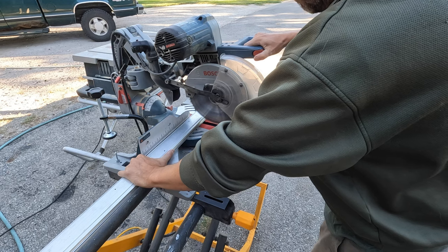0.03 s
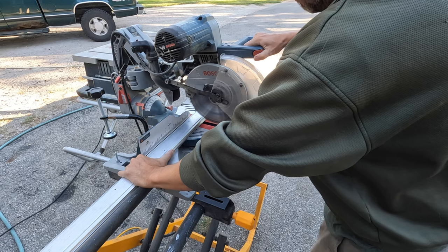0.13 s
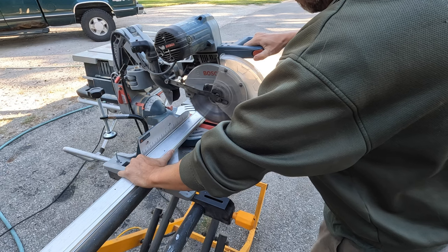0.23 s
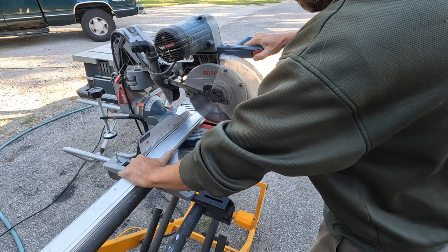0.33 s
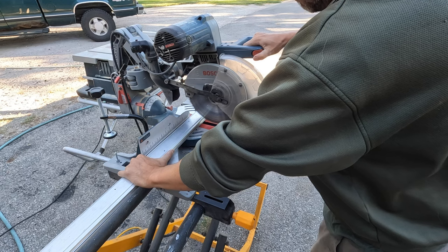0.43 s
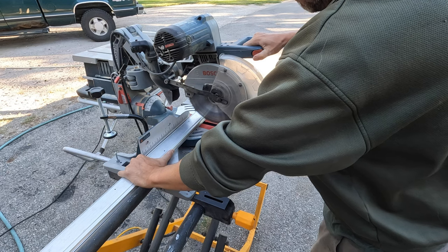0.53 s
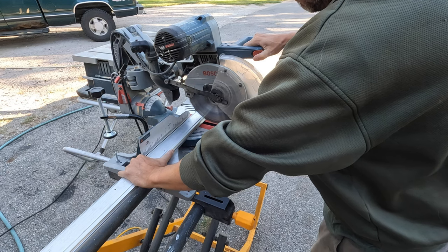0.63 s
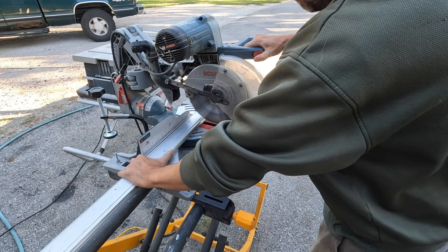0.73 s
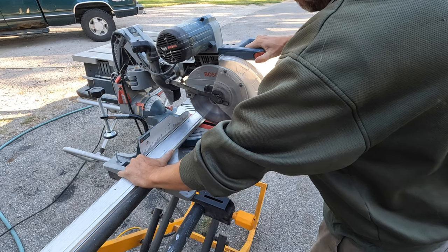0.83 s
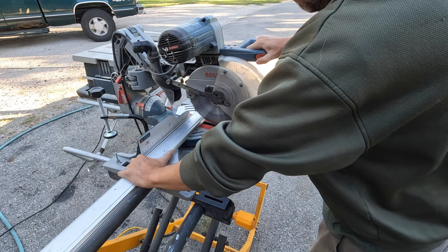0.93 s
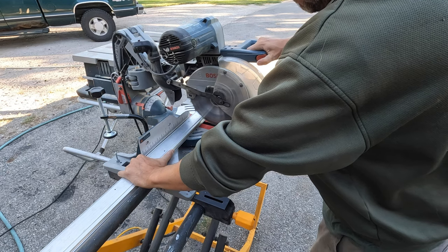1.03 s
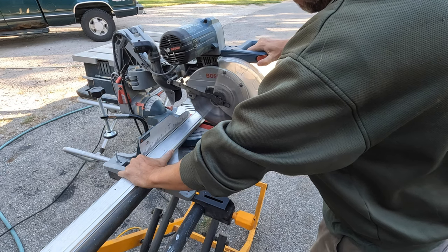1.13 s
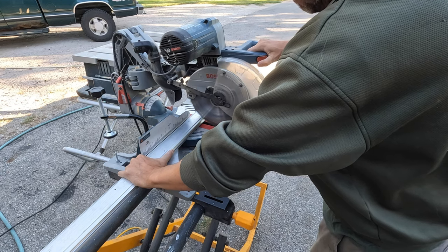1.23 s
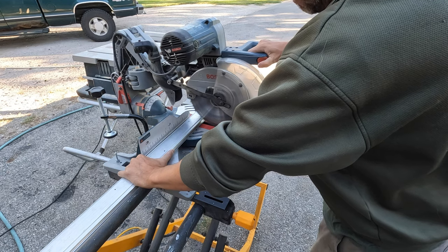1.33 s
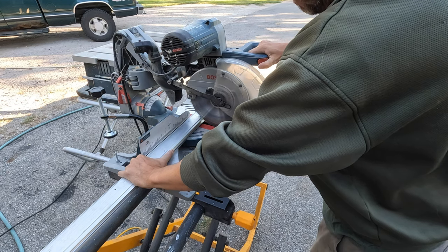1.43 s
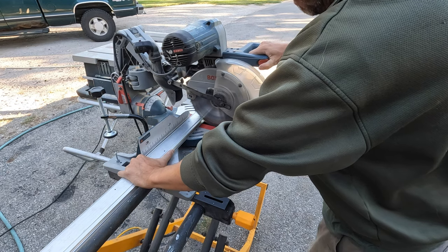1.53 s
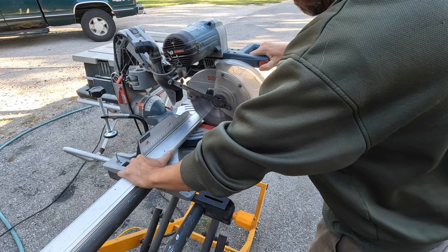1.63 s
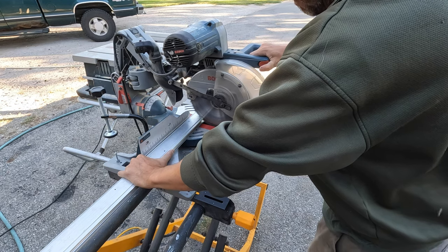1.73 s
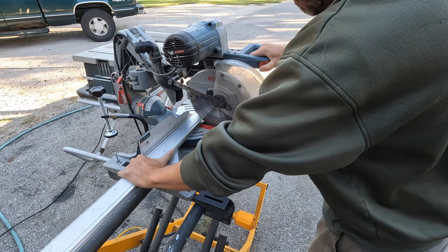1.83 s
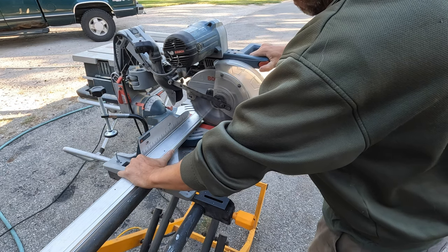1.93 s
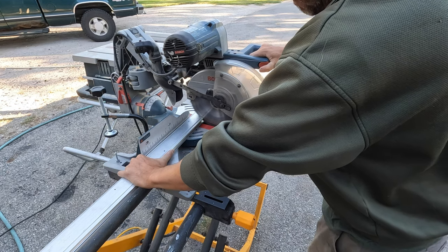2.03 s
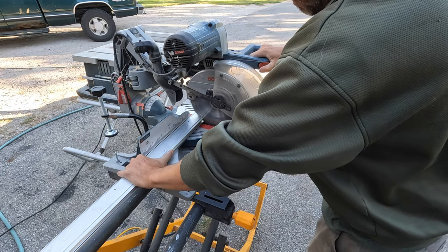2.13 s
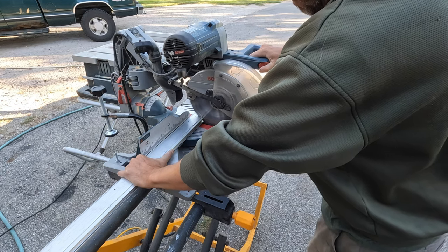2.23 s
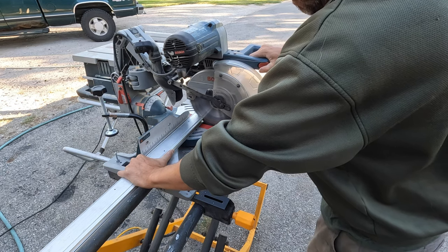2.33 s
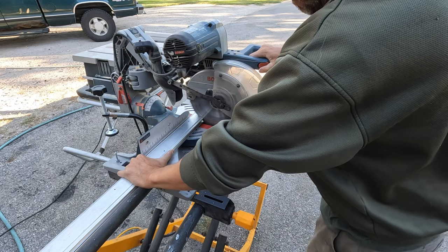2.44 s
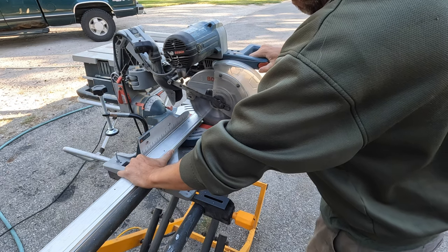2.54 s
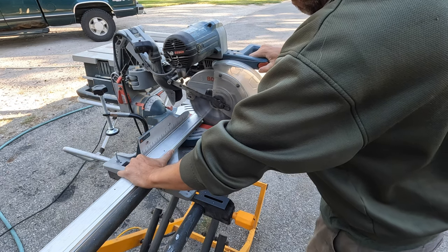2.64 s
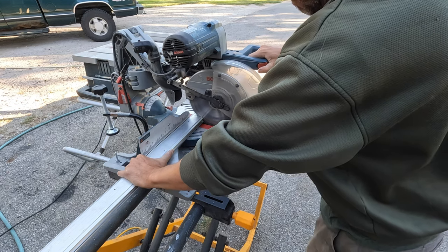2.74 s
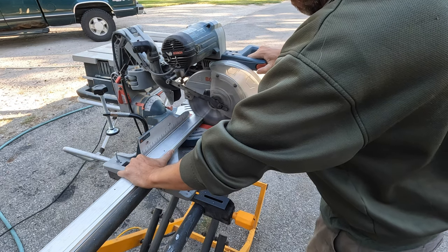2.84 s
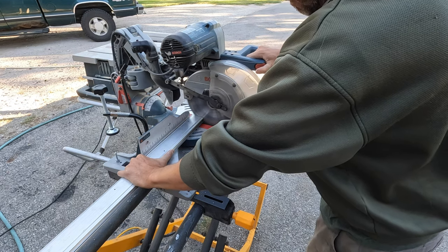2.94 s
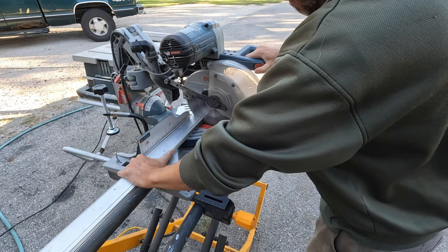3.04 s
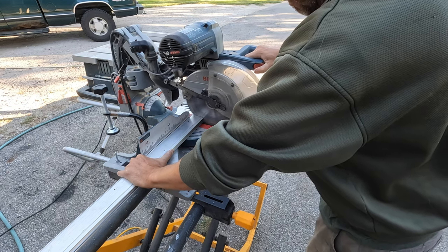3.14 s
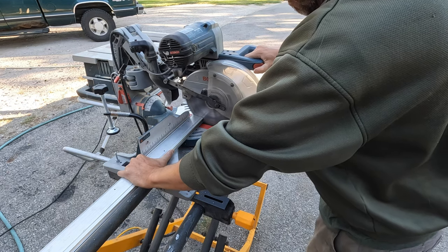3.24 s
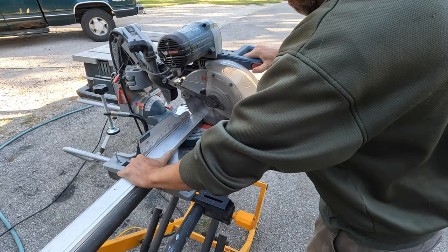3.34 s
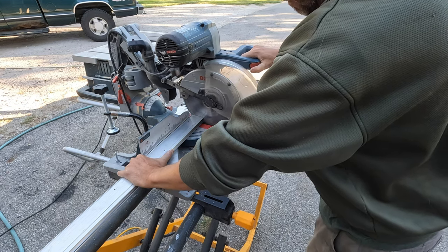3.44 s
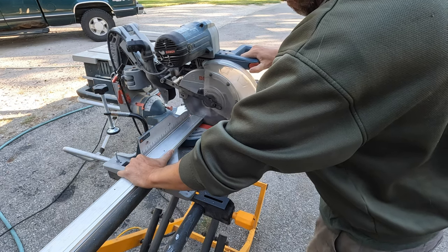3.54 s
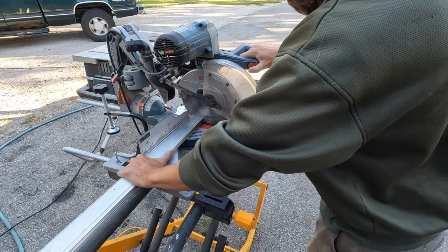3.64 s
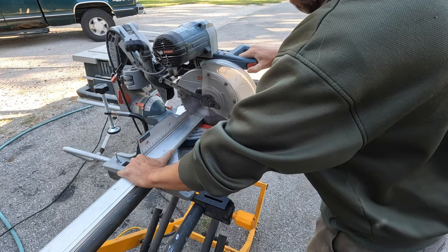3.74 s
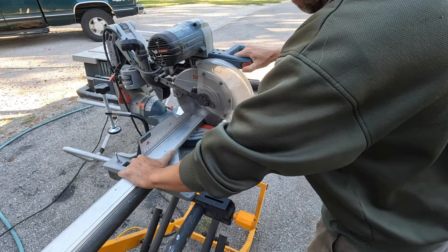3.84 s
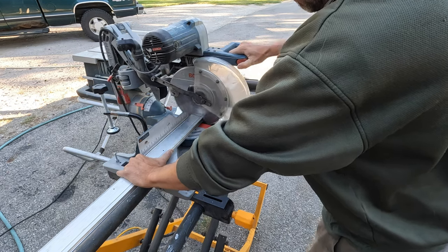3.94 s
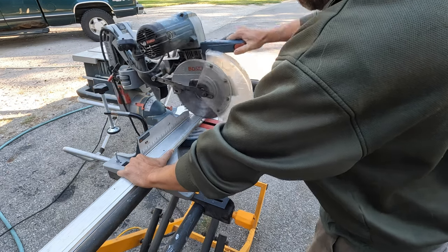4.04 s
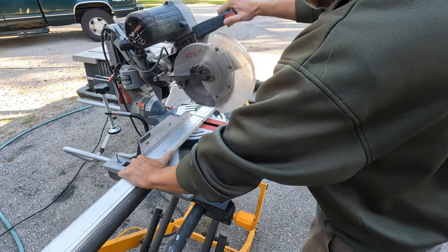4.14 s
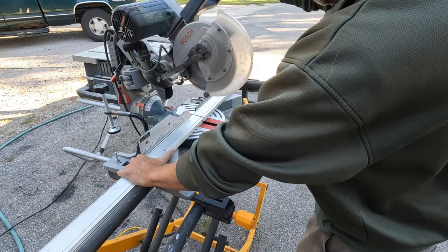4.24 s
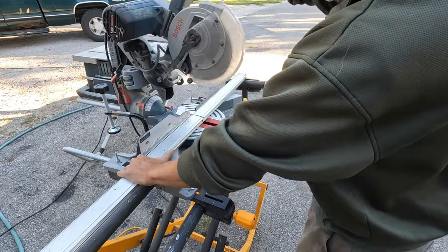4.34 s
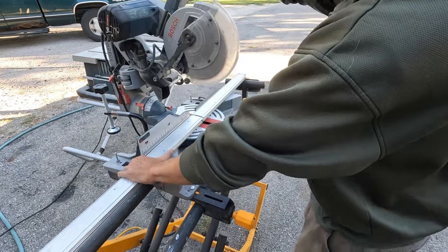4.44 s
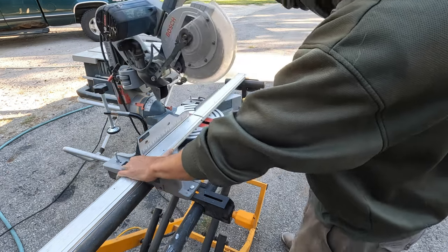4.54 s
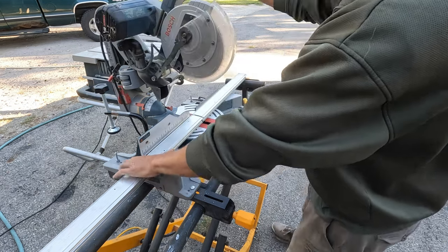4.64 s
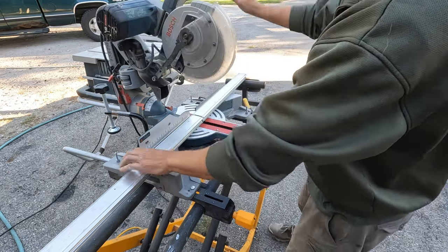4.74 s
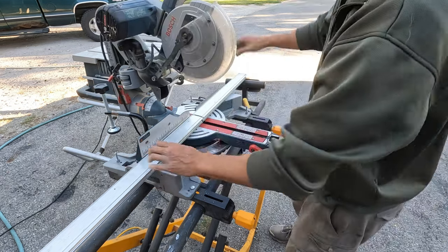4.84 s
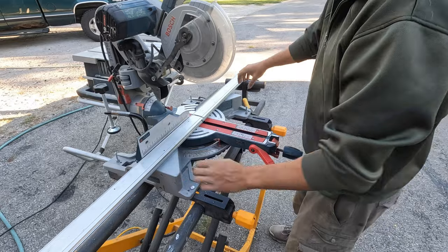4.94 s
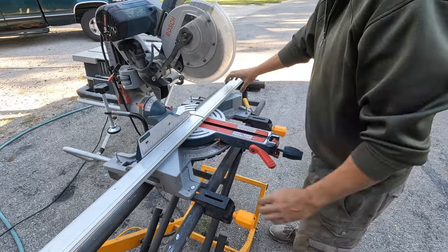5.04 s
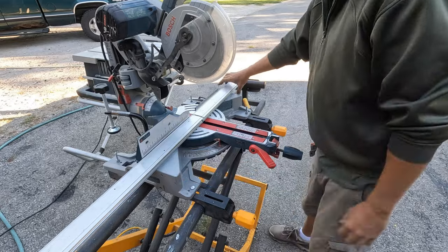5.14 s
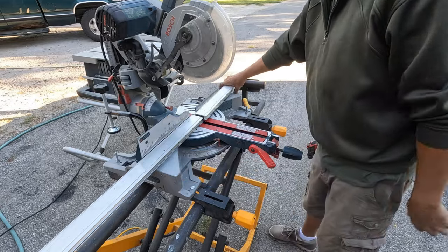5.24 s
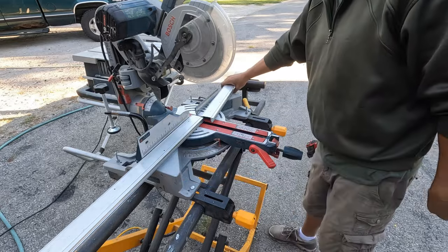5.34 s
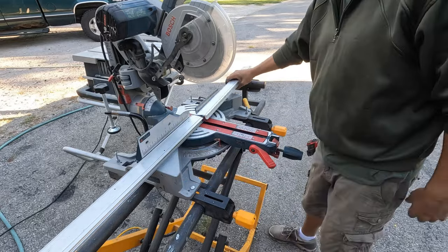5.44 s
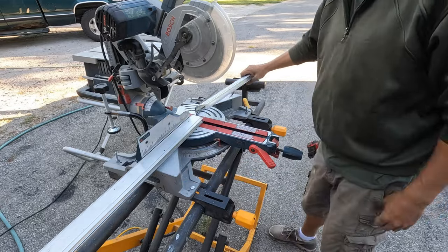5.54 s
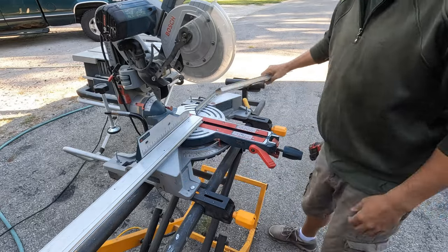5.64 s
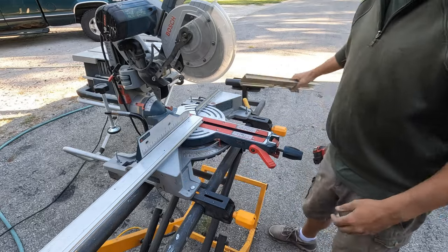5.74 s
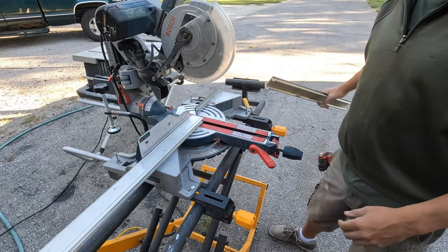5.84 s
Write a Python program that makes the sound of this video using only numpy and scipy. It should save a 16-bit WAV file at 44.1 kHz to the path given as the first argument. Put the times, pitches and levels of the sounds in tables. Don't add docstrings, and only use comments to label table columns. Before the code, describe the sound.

Outdoors on a paved yard, close to the microphone, a circular mitre saw is already cutting a hollow aluminium bar: a piercing, wavering whine over dense tearing hiss and metallic ringing. Just before four seconds the blade breaks through and the scream stops. The freed blade whooshes and its motor whirr falls quickly under the brake, with a low thud, then several sharp ringing knocks of the offcut being handled.

```python
import sys
import numpy as np
from scipy import signal
from scipy.fft import rfft, irfft, next_fast_len
from scipy.io import wavfile
from scipy.ndimage import uniform_filter1d

SR = 44100
rng = np.random.default_rng(int(sys.argv[2]) if len(sys.argv) > 2 else 0)


def ratio(d):
    e = np.asarray(d, float) / 20
    return 10 ** e


def int16_out(signal):
    q = np.round(np.clip(np.atleast_2d(signal).T, -1, 1) * 32767)
    wavfile.write(sys.argv[1], SR, q.astype(np.int16))


N = 259749
TEETH_COUNT = 60
THROUGH_S = 3.725


def seconds():
    return np.arange(N) / SR


def in_time(rows):
    s, values = np.transpose(rows)
    return np.interp(seconds(), s, values)


def rms_one(x):
    return x / np.sqrt(np.mean(x ** 2) + 1e-20)


def drift(rate):
    pole = np.exp(-80 * np.pi * rate / SR)
    white = rng.standard_normal(N // 40 + 2002)
    slow = signal.lfilter([1], [1, -2 * pole, pole * pole], white)[2000:]
    return np.interp(np.arange(N) / 40, np.arange(len(slow)), rms_one(slow))


def narrow(hz, width_hz, steady=0.):
    phase = 2 * np.pi * np.cumsum(hz * np.ones(N)) / SR
    in_phase = (steady + drift(width_hz)) * np.cos(phase)
    return rms_one(in_phase + drift(width_hz) * np.sin(phase))


def swells(rows):
    t = np.arange(0, N / SR + .002, .001)
    gain = 0
    for peak_s, rise, fall, db in rows:
        distance = (t - peak_s) / np.where(t < peak_s, rise, fall)
        gain = gain + ratio(np.maximum(db - 20 * distance ** 2, -150))
    return np.interp(seconds(), t, gain)


def coloured(x, points):
    hz = np.fft.rfftfreq(next_fast_len(N), 1 / SR) + 1
    f, db = np.array(points).T
    return rfft(x, next_fast_len(N)) * ratio(np.interp(np.log(hz), np.log(f), db)), hz


# t/s, f/Hz
TOOTH_RATE = [(0, 4330), (.5, 4245), (.75, 4205), (1.2, 4095), (1.5, 4022), (1.8, 3994), (2, 3972),
              (2.2, 3935), (2.5, 3893), (2.85, 3825), (3.05, 3870), (3.3, 3910), (3.4, 3893), (3.6, 3795),
              (3.75, 3715)]


def tooth_rate():
    return uniform_filter1d(in_time(TOOTH_RATE), SR // 10, mode="nearest")


# t/s, rate/(turns per s)
SPIN = [(3.7, 62), (3.8, 67), (4.05, 70), (4.2, 68), (4.65, 35), (4.8, 26), (5.1, 16), (5.4, 9.5),
        (5.89, 4.5)]


def turns():
    braked = uniform_filter1d(in_time(SPIN), SR // 10)
    return np.where(np.arange(N) < SPIN[0][0] * SR, tooth_rate() / TEETH_COUNT, braked)


# peak t/s, rise/s, fall/s, peak level/dB
SQUEALS = [
    [(.54, 0.039, 0.81, -30.5), (1.41, 0.14, 0.52, -26.5), (2.06, 0.29, 0.26, -23.5),
     (3.36, 0.077, .11, -26), (3.72, 0.1, 0.039, -19)],
    [(1.2, 0.45, 0.22, -33), (1.58, 0.15, 0.13, -22.5), (1.92, .2, .25, -24.5), (2.73, .09, 0.15, -31.5),
     (3.46, 0.073, 0.16, -25.5)],
    [(.95, .35, 0.96, -39.5), (1.55, 0.13, .25, -35), (2.35, 0.1, 0.27, -42), (2.87, 0.12, 0.19, -41.5),
     (3.28, 0.099, 0.31, -39.5), (3.55, 0.16, 0.12, -34.5)],
    [(1.5, .6, .3, -48), (1.95, .3, 0.13, -48), (2.3, 0.27, 0.2, -42), (2.76, 0.16, .2, -55),
     (2.95, .15, 0.16, -44), (3.52, 0.15, 0.16, -40)],
]
WHINE_DB = [-59.5, -64, -46.5, -60]


def whine():
    rate_hz = tooth_rate()
    wobble = 1 + 0.09 * np.sin(2 * np.pi * np.cumsum(turns()) / SR)
    leaves = np.clip((3.77 - seconds()) / 0.05, 0, 1)
    tones = 0
    for multiple, (db, rows) in enumerate(zip(WHINE_DB, SQUEALS), 1):
        tone = narrow(multiple * rate_hz, 8.4 * multiple, steady=6)
        tones = tones + (ratio(db) + swells(rows)) * tone
    return leaves * wobble * tones


# t/s, level/dB
BITE = [(0.0, -35.5), (0.26, -32.5), (0.89, -33), (1.02, -36.5), (1.39, -36), (1.56, -39), (1.77, -35),
        (1.84, -36), (1.99, -37.5), (2.03, -41.5), (2.04, -38.5), (2.39, -32.5), (2.68, -33), (2.74, -39),
        (3.17, -34), (3.52, -37.5), (3.59, -31.5), (3.72, -32)]
# level/dB at a bite of -37 dB, share of bite swing, fall/(dB per s) once
TEARING = [(-39.5, 0.57, 259), (-35.5, 1.52, 229), (-31, 0.51, 158), (-32.5, 0.033, 290.5)]


def tearing():
    through = np.maximum(seconds() - THROUGH_S, 0)
    swing_db = in_time(BITE) + 37
    return [np.maximum(db + share * swing_db - fall * through, -110) for db, share, fall in TEARING]


def chips():
    sizes = ratio(3.0 * np.minimum(rng.exponential(1, N), 4))
    clicks = (rng.random(N) < 6000 / SR) * sizes * rng.choice([-1, 1], N)
    angle = np.cumsum(turns()) / SR % 1
    patterns = np.diff(rng.standard_normal((2, 241)))
    one, other = (np.interp(angle, np.arange(240) / 240, p, period=1) for p in patterns)
    blend = 2 * drift(.7)
    uneven_teeth = rms_one(np.cos(blend) * one + np.sin(blend) * other)
    return rms_one(clicks) * .5 + rng.standard_normal(N) + .75 * uneven_teeth


# from f/Hz, to f/Hz
BANDS = [(300, 1400), (1400, 3500), (3500, 7900), (7900, 16000)]


def hiss(source, colour, levels, patchy_db):
    spectrum, hz = coloured(source, colour)
    power = np.abs(spectrum) ** 2 * 2 / next_fast_len(N) ** 2
    octaves = np.log2(hz)
    band_db = [10 * np.log10(power[(hz > lo) & (hz < hi)].sum()) for lo, hi in BANDS]
    levels = [curve - own_db for curve, own_db in zip(levels, band_db)]
    places = np.log2(np.prod(BANDS, axis=1)) / 2
    together, out = drift(48), 0
    for centre in np.arange(6.8, 14.4, .5):
        shape = np.cos(np.pi * np.clip(octaves - centre, -.5, .5)) ** 2
        place = np.interp(centre, places, [0, 1, 2, 2.999])
        below = int(place)
        level_db = levels[below] + place % 1 * (levels[below + 1] - levels[below])
        flicker_db = patchy_db * (0.27 * together + drift(7.9))
        out = out + ratio(level_db + flicker_db) * irfft(spectrum * shape)[:N]
    return out


# f/Hz, level/dB per Hz
CUT_COLOUR = [(59, -48), (100, -10.5), (383, -11.5), (539, -13.5), (653, -10), (826, -10.5), (1600, -9.5),
              (1980, -17), (3520, -11.5), (3920, -9), (4270, -7), (7270, -13), (7920, -13), (9000, -13.5),
              (16400, -12)]


def cut_noise(cut_db):
    return hiss(chips(), CUT_COLOUR, cut_db, patchy_db=0.7) * ratio(-2.5)


# f/Hz, width/Hz, early level/dB, midway level/dB, late level/dB
BAR = [(927, 18, -5.5, -49, -37), (1002, 7.6, -6.5, -17.5, -9.5), (1592, 8, -4.5, -37, -9),
       (1824, 49, -53, -27, -26.5), (2130, 21, -6, -11.5, -13), (2614, 89, -33, -21, -3.5),
       (3310, 20, -9, -8, -30), (3767, 24, -1, -14, -5), (3750, 5.9, -7, -65, -20.5),
       (3972, 10.8, -3.5, 4, -1), (4540, 23, -32, -8.5, -4.5), (4660, 23.76, -7, -4, -19.5),
       (4870, 46, -22, -17, -2.5), (5070, 45, -1, -0.5, -2), (5360, 7.6, -17.5, -1.5, -2.5),
       (5447, 10, -3.5, -8.5, -12.5), (5770, 28, -28, -20, -35), (6120, 44, -10, -1, -17),
       (6334, 57, 0, -8, -4.5), (7730, 78, -29, -7, -8)]


def bar(drive_db):
    t = seconds()
    held_db = np.maximum.accumulate(drive_db - 31 + 45 * t) - 45 * t
    drive_db = np.maximum(drive_db, held_db)
    out = 0
    for hz, width, *levels in BAR:
        mode_db = drive_db - 8.5 + np.interp(t, [.6, 1.6, 2.7], levels) + 1.8 * drift(2.5)
        stray_hz = hz * (1 + .004 * drift(.8))
        out = out + ratio(mode_db) * narrow(stray_hz, width * 0.96, steady=.6)
    return out


# f/Hz at rest, nodal diameters
BLADE = [(2667, 4.0), (3027, 1.9), (2093, 3), (3308, 3.4), (1770, 3.1), (1615, 1.2), (862, .3), (1130, 1.1),
         (3950, 3.1), (4700, 2)]
# backward level/dB, forward level/dB, growth/(dB per s) while braking
BLADE_DB = [(0, -2, 3), (0, -11, 2), (-8, -8, 2), (-16, -14, .3), (-12, -7, 2), (-13, -10, 3), (-10, -5, 4),
            (-16, -16, .3), (-30, -34, -18), (-30, -34, -20)]


def blade(mid_db):
    spin, t = turns(), seconds()
    free_db = -50 - 26 * np.maximum(t - 5.64, 0)
    ring_db = np.where(t < SPIN[0][0], mid_db - 12.5, free_db)
    braking = np.clip(t - 5, -1.2, 1)
    out = 0
    for (hz, diameters), (back_db, forward_db, growth) in zip(BLADE, BLADE_DB):
        for way, db in ((-1, back_db), (1.0, forward_db)):
            wave = narrow(hz + way * diameters * spin, 3.0 * (1 + 2000 / hz), steady=hz / 900)
            out = out + ratio(ring_db + db + growth * braking) * wave
    return out


# multiple of blade turns, level/dB
MOTOR = [(4.1, -75.5), (8.1, -63.5)]


def motor():
    loaded = np.clip((3.8 - seconds()) * 10, 0, 1)
    spin = turns()
    return loaded * sum(ratio(db + 6.9 * drift(7.5)) * narrow(order * spin, 7.7, steady=1.0)
                        for order, db in MOTOR)


# from t/s, to t/s, f/Hz, width/Hz, level/dB
FAINT = [(-.3, 3.9, 3972, 4.5, -40), (3.74, 4.3, 3736, 19, -45.5), (0.848, 1.9, 532.6, 10, -49.5),
         (1.298, 1.2, 3900, 4.2, -43), (2.252, 2.72, 5270, 18, -30.5), (2.551, 2.88, 1860, 26, -43.5),
         (2.798, 3.45, 5883, 13, -37.5), (2.98, 3.42, 806, 67, -42), (3.281, 3.86, 3960, 4.8, -39),
         (3.55, 3.67, 1600, 11, -38), (3.74, 4.3, 2368, 25, -43), (3.85, 4.25, 4570, 53, -44),
         (4.302, 5.1, 5200, 176, -52.5), (4.119, 4.8, 12100, 520, -62), (4.651, 5.55, 14400, 670, -78),
         (4.7, 5.8, 13200, 810, -75), (4.947, 7.2, 227.2, 8.8, -64)]


def faint():
    t, out = seconds(), 0
    for start, end, hz, width, db in FAINT:
        arch = np.sin(np.pi * np.clip((t - start) / (end - start), 0, 1)) ** 0.87
        out = out + ratio(db) * arch * narrow(hz, width, steady=min(12 / width, .8))
    return out


# t/s, level/dB
FREE_SWING = [(3.7, -33), (3.78, -8.5), (3.98, -0.5), (4.13, 3), (4.27, 1), (4.6, -2), (5.3, 3.5), (5.6, 0),
              (5.89, -6.5)]
# level/dB at full speed, share of that level swing, loss/dB per halving of speed
AIR = [(-41.5, 0.7, 0.46), (-40.5, 1, 1.26), (-38.5, 0.97, 5.5), (-54, 0.73, 4.5)]
# f/Hz, level/dB per Hz
FREE_COLOUR = [(60, -60), (100, -10.5), (200, -19.5), (400, -12.5), (500, -7.5), (900, -4), (1600, -0.5),
               (3000, 2), (3500, 0), (4000, -10.5), (5200, -7.5), (7500, -14.5), (14000, -20.5),
               (16400, -30)]


def draught():
    halvings = np.log2(70 / turns())
    swing_db = in_time(FREE_SWING)
    levels = [db + share * swing_db - loss * halvings for db, share, loss in AIR]
    return hiss(rng.standard_normal(N), FREE_COLOUR, levels, patchy_db=1.64) * ratio(-4.5)


# t/s, level/dB
WHIRR = [(3.7, -69), (3.8, -48), (4.25, -38), (4.95, -44), (5.15, -50.5), (5.45, -70), (5.89, -69.5)]
# peak t/s, rise/s, fall/s, peak level/dB
WHISTLES = [
    (3.95, .6, .9, -52),
    (4.8, 0.21, 0.28, -47.5),
    (5.1, 0.13, .35, -56),
]


def run_down():
    spin = turns()
    whirr = .7 * narrow(35 * spin, 110)
    for order in (30, 32.5, 35, 37.5):
        whirr = whirr + .5 * narrow(order * spin, 20, steady=1.8)
    whistle = swells(WHISTLES) * narrow(TEETH_COUNT * spin, 44, steady=1.0)
    return ratio(in_time(WHIRR) - 5.5) * whirr + whistle


def bandpass(x, order, low_hz, high_hz):
    return signal.sosfilt(signal.butter(order, [low_hz, high_hz], "band", fs=SR, output="sos"), x)


# t/s, peak level/dB, centre f/Hz, t60/s, sharp tick level/dB, ring level/dB
KNOCKS = [
    (4.363, -25, 540, .08, -36, -40),
    (5.18, -34, 850, .25, -44, -22),
    (5.201, -16, 1400, .07, -23, -25),
    (5.279, -27, 2500, .07, -21, -20),
    (5.308, -24.5, 1300, .14, -36, -16),
    (5.458, -41, 4300, .06, -44, -30),
    (5.79, -54, 5600, .04, -44, -40),
]
# f/Hz, level/dB, t60/s
OFFCUT = [(846, -6, 1), (1024, -3.5, 0.17), (1240, -3, 0.13), (1496, 5.5, 0.28), (1580, -5, 0.085),
          (2020, -15, 0.047), (3390, -1.5, 0.093), (4970, 1, 0.059)]


def knocks():
    out, t = np.zeros(N + SR), np.arange(SR // 3) / SR
    rise = 1 - np.exp(-t / .003)
    for s, db, hz, t60, tick_db, ring_db in KNOCKS:
        white = rng.standard_normal((2, len(t)))
        crack = rms_one(bandpass(white[0], 2, hz / 1.5, hz * 1.4))
        tick = rms_one(bandpass(white[1], 1, 1500, 4000))
        noise = ratio(-6 - 60 * t / t60) * crack + ratio(tick_db + 6 - 60 * t / .06) * tick
        body = 0
        for mode, level, ring in OFFCUT:
            decay = ratio(level + rng.normal(0, 5.7) - 60 * t / ring)
            body = body + decay * np.sin(2 * np.pi * mode * t)
        out[round(s * SR):][:len(t)] += ratio(db) * rise * (noise + ratio(ring_db + 6.0) * body)
    return out[:N]


def echo(x):
    delay_s, gain, dull_hz = .003775, .8, 13860
    size = next_fast_len(N + 400)
    hz = np.fft.rfftfreq(size, 1 / SR)
    back = gain / np.sqrt(1 + (hz / dull_hz) ** 2)
    response = (1 + back * np.exp(-2j * np.pi * hz * delay_s)) / np.sqrt(1 + back ** 2)
    return irfft(rfft(x, size) * response, size)[:N]


# f/Hz, level/dB
PORTS = [(60, -20), (110, -9.5), (200, -28), (380, -24.5), (700, -36.5), (1290, -45.5), (2380, -44.5),
         (4400, -44.5), (8120, -36.5), (15000, -33.5)]


def ports(mid):
    scatter = rng.standard_normal(2500) * np.exp(-np.arange(2500) / 700)
    scattered = signal.fftconvolve(mid, scatter / np.linalg.norm(scatter))[:N]
    side = ratio(7) * irfft(coloured(scattered, PORTS)[0])[:N]
    return np.array([mid + side, mid - side])


def scene():
    cut_db = tearing()
    tones = whine() + bar(cut_db[2]) + blade(cut_db[1]) + motor() + faint()
    return ports(echo(cut_noise(cut_db) + draught() + run_down() + knocks()) + tones)


def capsule(dry):
    push, settle_s = 5.3, 0.3
    load = uniform_filter1d(dry.mean(axis=0) ** 2, size=220)
    keep = np.exp(-1 / (settle_s * SR))
    rest = -push * signal.lfilter([1, -1], [1, -keep], load - load[:SR // 10].mean())
    load_db = 10 * np.log10(uniform_filter1d(load, 2500) + 1e-9) + 25
    loaded_db = -59 + 2.2 * load_db + 1.4 * drift(8.9)
    free_db = -80 + 11.5 * np.maximum(seconds() - THROUGH_S, 0)
    low = bandpass(rng.standard_normal((2, N)), 3, 18, 85)
    rumble = rms_one(low[0]) + .05 * rms_one(low[1]) * [[1], [-1]]
    return rest + ratio(np.maximum(loaded_db, free_db)) * rumble


def low_pass(x):
    return signal.sosfilt(signal.butter(12, 16510, fs=SR, output="sos"), x)


def record(dry):
    heard = rfft(.45 * np.tanh(dry / .45) + capsule(dry), next_fast_len(N))
    passes = np.fft.rfftfreq(next_fast_len(N), 1 / SR) < 16530
    return low_pass(irfft(heard * passes)[:, :N])


dry = scene()
out = record(dry)
int16_out(out)
```